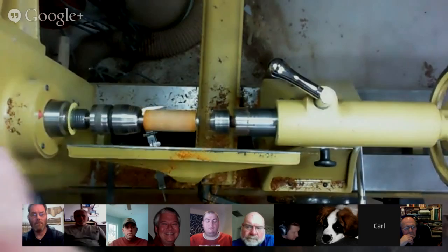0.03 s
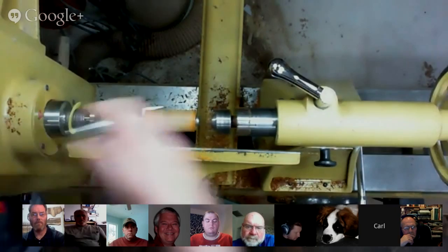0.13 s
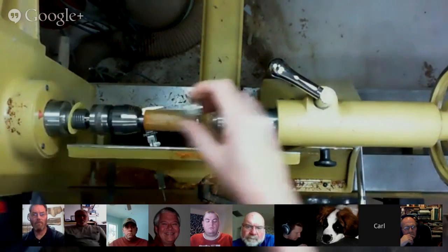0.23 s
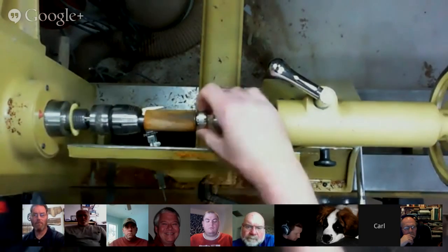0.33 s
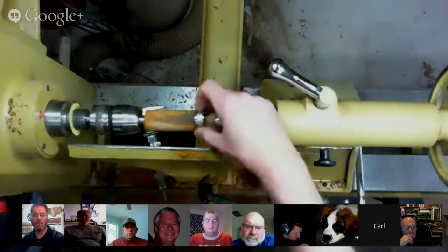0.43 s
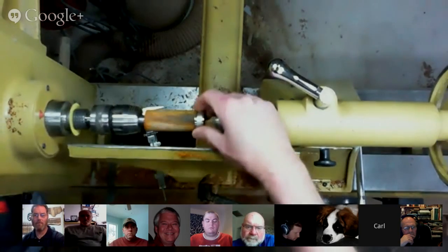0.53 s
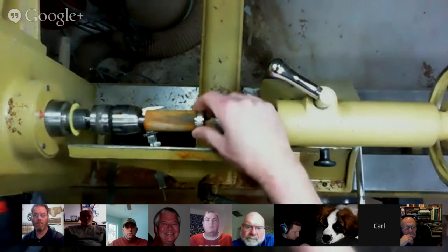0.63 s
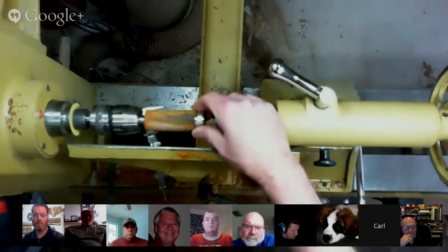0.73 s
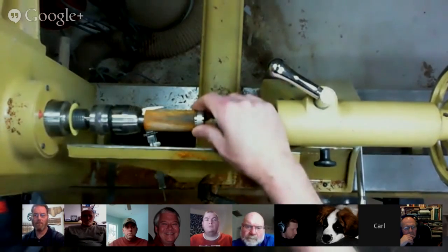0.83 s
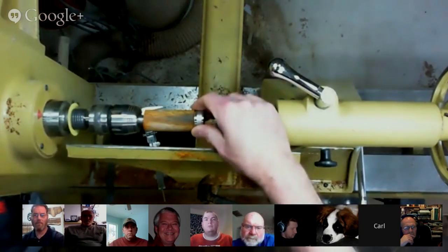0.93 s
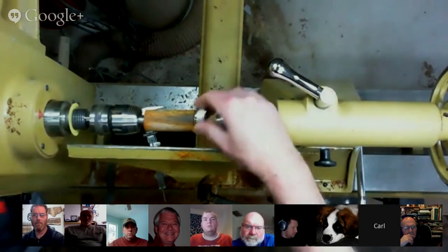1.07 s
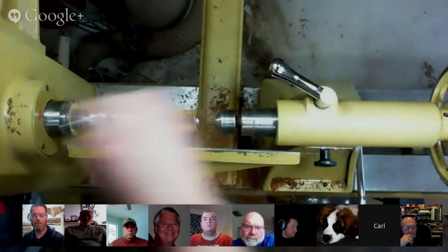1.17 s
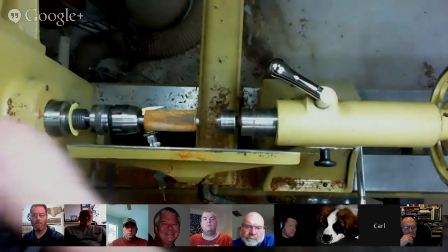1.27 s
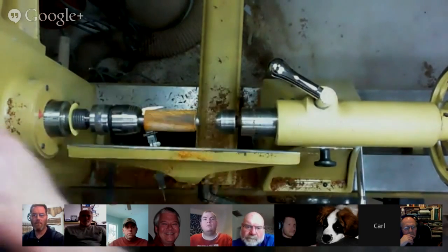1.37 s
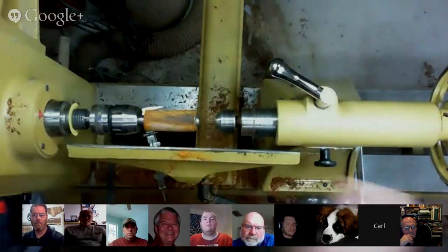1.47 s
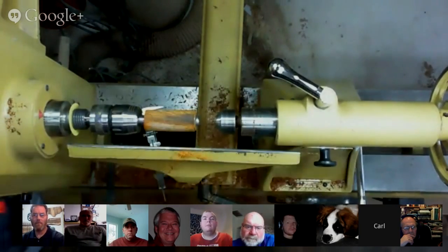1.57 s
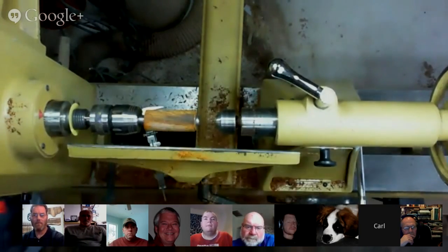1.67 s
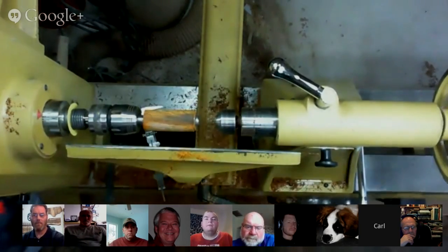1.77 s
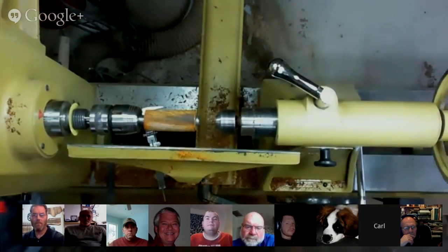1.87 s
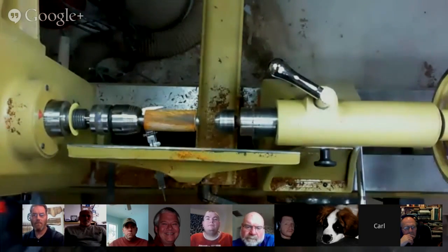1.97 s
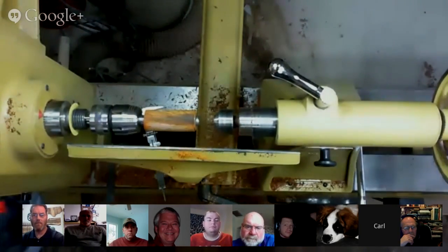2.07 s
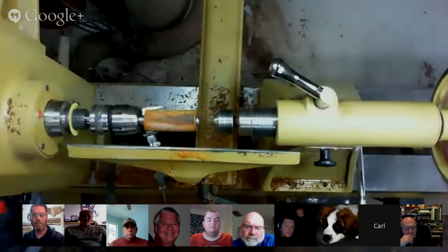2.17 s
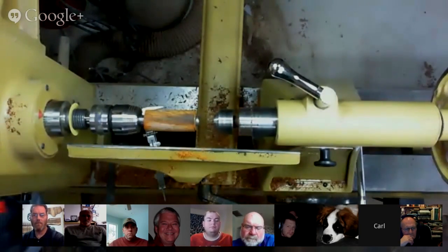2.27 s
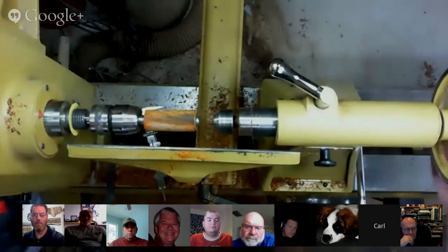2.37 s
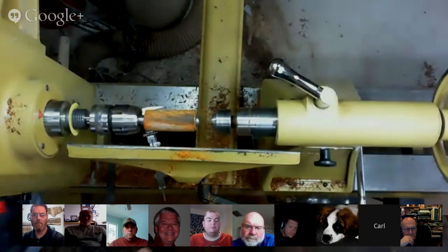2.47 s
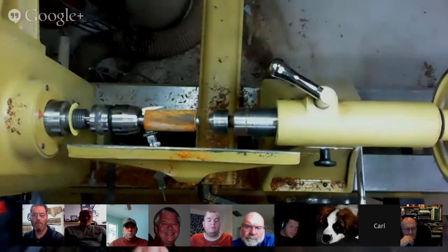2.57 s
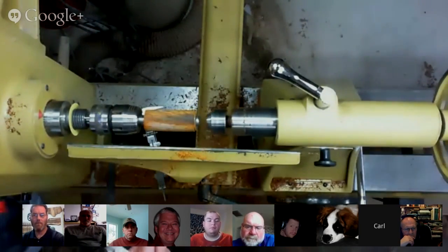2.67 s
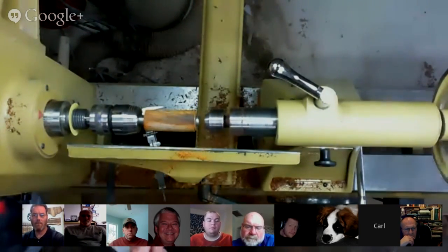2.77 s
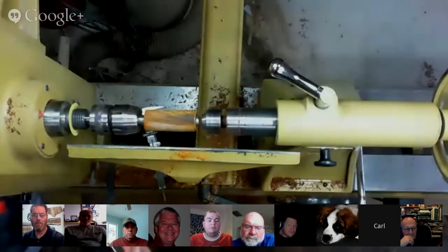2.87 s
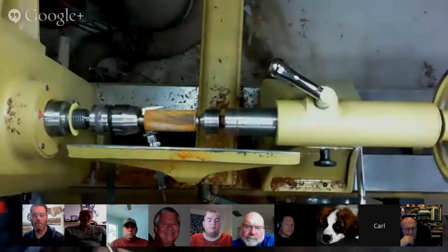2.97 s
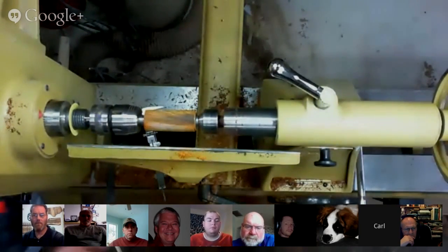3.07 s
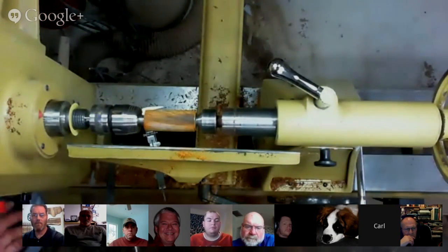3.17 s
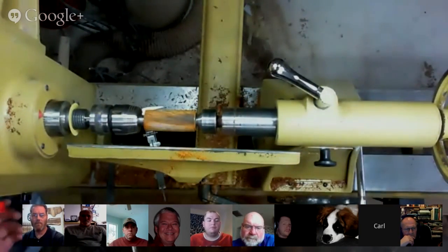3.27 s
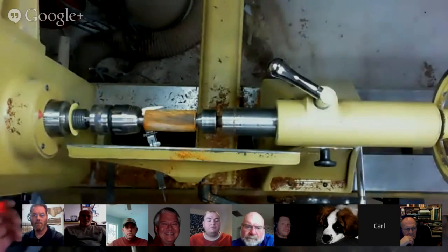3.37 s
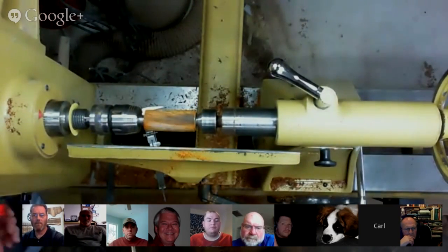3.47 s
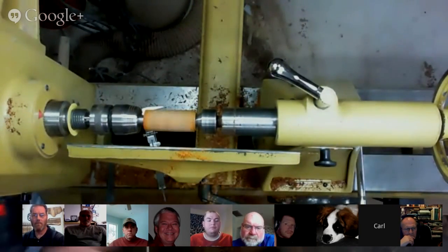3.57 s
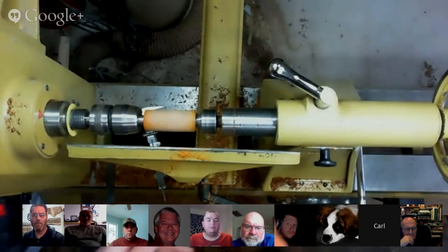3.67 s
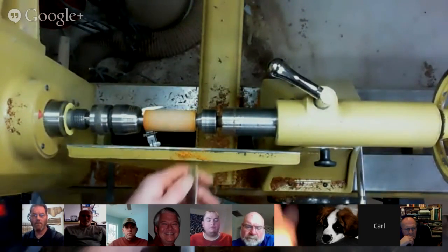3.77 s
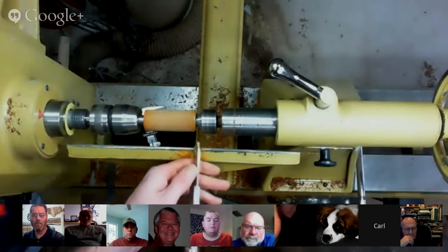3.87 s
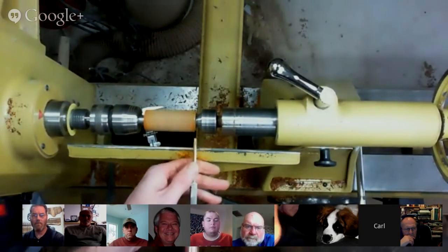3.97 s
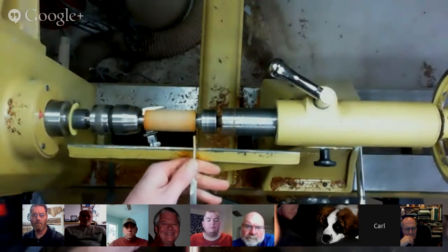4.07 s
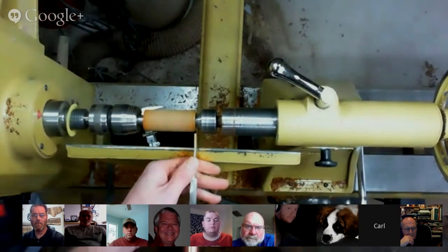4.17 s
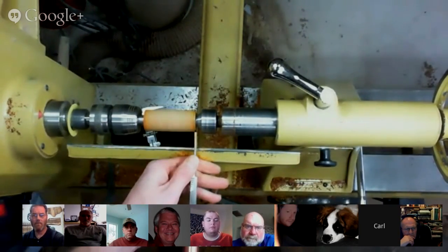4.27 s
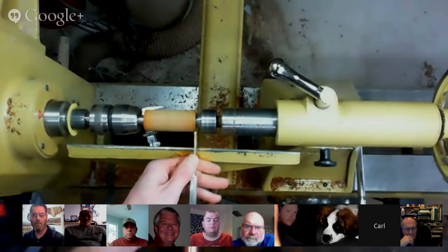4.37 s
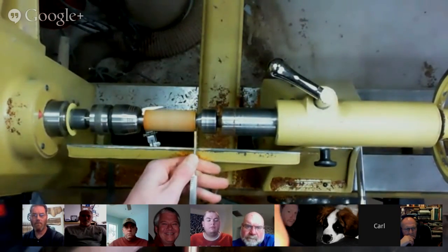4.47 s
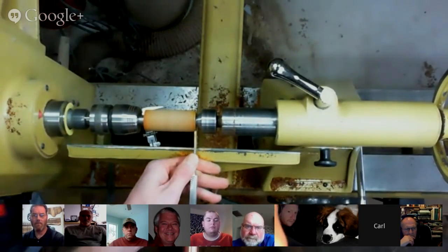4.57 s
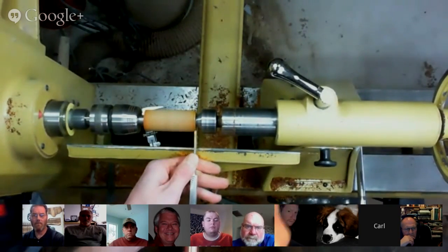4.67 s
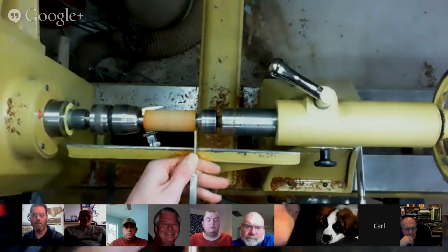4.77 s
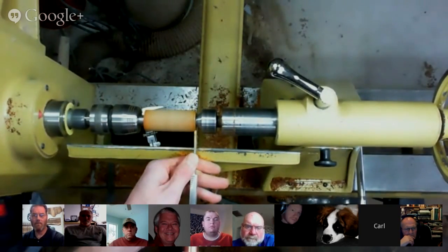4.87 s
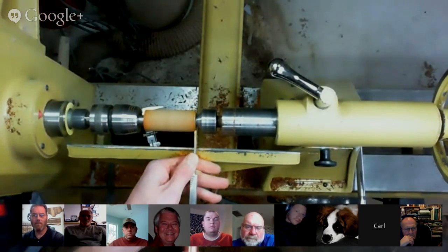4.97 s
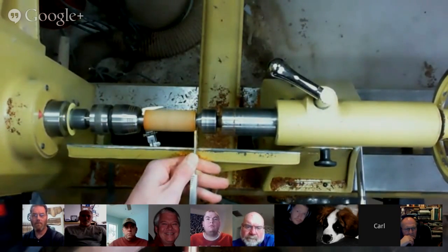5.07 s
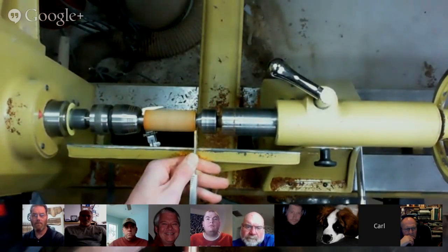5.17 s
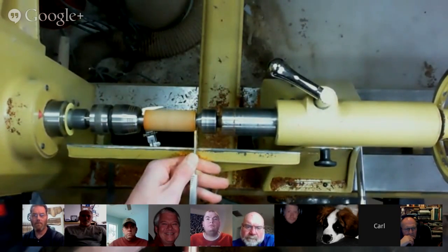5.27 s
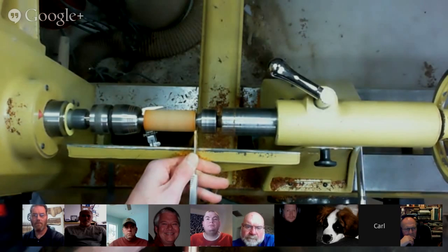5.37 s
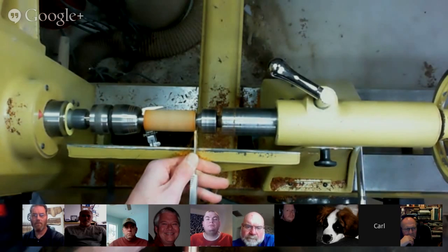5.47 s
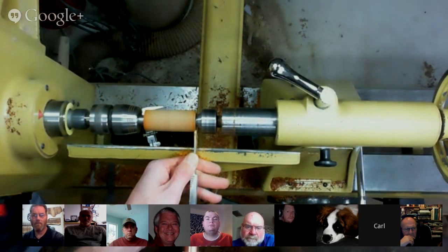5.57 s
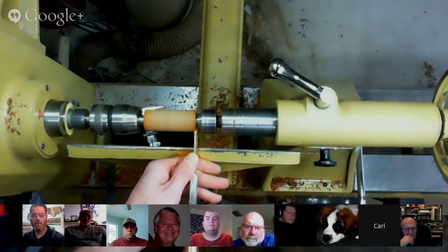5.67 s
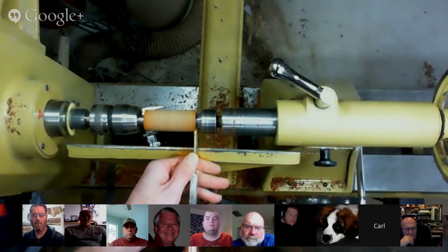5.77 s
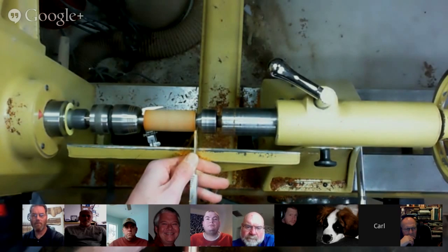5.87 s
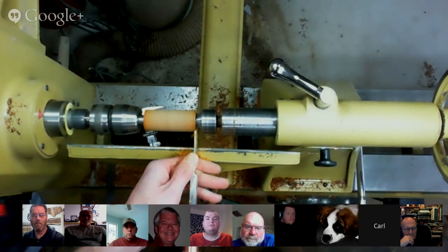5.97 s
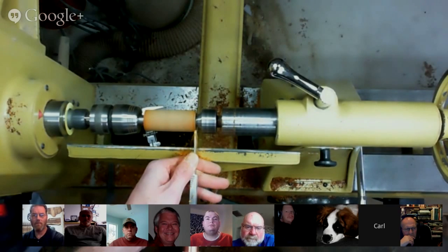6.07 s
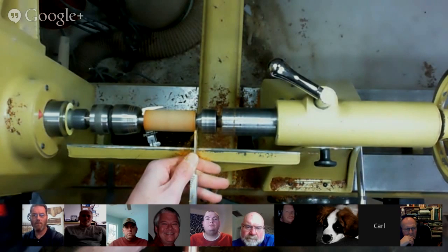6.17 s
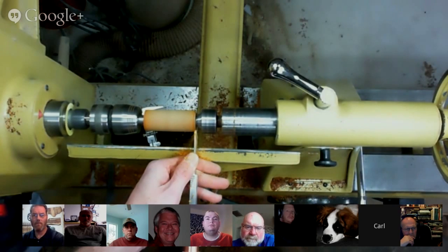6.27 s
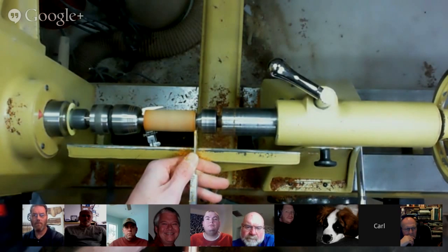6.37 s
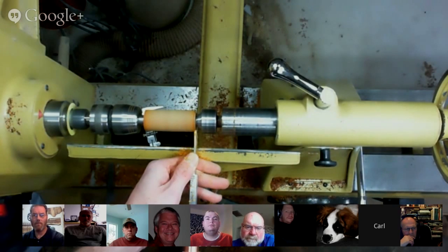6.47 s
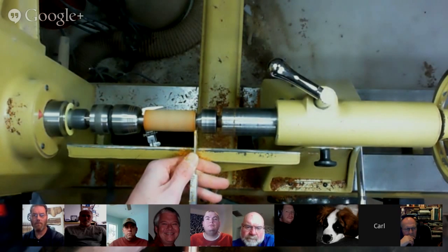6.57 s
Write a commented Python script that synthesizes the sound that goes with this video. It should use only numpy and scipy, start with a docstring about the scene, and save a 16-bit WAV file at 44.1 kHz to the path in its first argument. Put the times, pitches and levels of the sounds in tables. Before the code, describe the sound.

Hands knock and slide the steel fittings of a small wood lathe, giving irregular light taps and a few firmer clunks. The motor starts and whirrs with a brief rising whine. A parting tool bites into the spinning wood with a rasping hiss, a thin squeal and a short throb, then lifts away and is set down with a clink. The workshop is nearly silent between sounds, heard through a dull, patchy mono call microphone.

```python
"""Parting cut on a small wood lathe

Hands knock and slide the steel fittings, the motor runs up, then a parting tool bites. The same wood
passes the edge once a turn, so the hiss repeats and rings the tool; the tool is lifted and set down.
The workshop is heard through a mono call microphone that is nearly silent between sounds."""
import sys
import numpy as np
from scipy import signal
from scipy.fft import rfft, irfft
from scipy.io import wavfile
from scipy.ndimage import uniform_filter1d

SR = 44100
rng = np.random.default_rng(int(sys.argv[2]) if len(sys.argv) > 2 else 0)


def master_out(mix):
    """Clip the mix to full scale and print it as 16-bit PCM to the path in sys.argv[1]."""
    frames = np.transpose(np.atleast_2d(mix))
    ceiling = np.clip(frames, -1, 1)
    pcm = np.round(ceiling * 32767).astype(np.int16)
    wavfile.write(sys.argv[1], SR, pcm)


N = 291545
TIME = np.arange(N) / SR
TURN_SAMPLES = 1327  # one spindle turn, 33.2 turns a second


def undb(db):
    """Decibels to gain."""
    return 10 ** (np.asarray(db) / 20)


def unit(x):
    """Scale to rms 1."""
    return x / np.sqrt(np.mean(x ** 2))


def automation(table):
    """A soft gate, open over the table's time span, then each column as a curve."""
    times, *columns = np.transpose(table)
    gate = uniform_filter1d(((TIME >= times[0]) & (TIME <= times[-1])) * 1., size=400)
    return [gate] + [np.interp(TIME, times, column) for column in columns]


def eq_curve(hz, points):
    """Gain of (Hz, dB) points joined on a log-frequency axis."""
    freqs, db = np.transpose(points)
    return undb(np.interp(np.log(hz + 1), np.log(freqs), db))


def resonances(hz, modes):
    """Summed gain of (Hz, width in Hz, dB) resonances."""
    return np.sqrt(sum(undb(2 * db) / (1 + ((hz - f) / (width / 2)) ** 2) for f, width, db in modes))


def shaped(x, gain):
    """Filter by a function of frequency; rms 1."""
    return unit(irfft(rfft(x) * gain(np.fft.rfftfreq(len(x), 1 / SR)), len(x)))


def high_shelf(x, hz, db):
    """Move the treble above hz by a dB curve."""
    treble = signal.sosfiltfilt(signal.butter(2, hz, "high", fs=SR, output="sos"), x)
    return x + (undb(db) - 1) * treble


def wander(rate_hz):
    """Smooth random motion with a spread of 1."""
    hold = int(SR / rate_hz)
    held = np.repeat(rng.standard_normal(N // hold + 1), hold)
    smooth = uniform_filter1d(uniform_filter1d(held, hold), hold)[:N]
    return smooth / np.std(smooth)


def flicker(x, depth_db, rate_hz):
    """Let each half-octave band wander in level on its own; rms 1."""
    spectrum, octave = rfft(x), np.log2(np.fft.rfftfreq(N, 1 / SR) + 1)
    bands = (irfft(spectrum * np.clip(1 - 2 * abs(octave - c), 0, 1), N) for c in np.arange(4, 13.6, .5))
    return unit(sum(band * undb(depth_db * wander(rate_hz)) for band in bands))


def turning_noise(memory):
    """Noise that comes round again, keeping the share `memory` of the turn before."""
    turns = rng.standard_normal((N // TURN_SAMPLES + 1, TURN_SAMPLES))
    return unit(signal.lfilter([1], [1, -memory], turns, axis=0).ravel()[:N])


# Tool pressure in the wood. Each row: time in seconds, level in dB, squeal against the hiss in dB.
CUT_PRESSURE = [(3.72, -62, -20), (3.78, -47, -6), (3.89, -44.5, -10.5), (4.15, -40.5, -10),
                (4.28, -39.5, -3.5), (4.6, -38.5, -3.5), (5.01, -39, -12), (5.2, -37.5, -22),
                (5.5, -39, -13), (5.6, -41, -8.5), (5.97, -43.5, -9), (6.03, -58, -18)]
# Colour of the tearing fibres. Each row: frequency in Hz, level in dB.
FIBRE_EQ = [(710, -23), (1200, 0.5), (1500, -7.5), (1940, -12), (2690, -3.5), (3640, -2.5), (4060, -0.5),
            (5710, -4.5), (6280, 2.5), (7960, -20.5), (10300, -89), (17500, -120)]
# The tool's throb: start and end in seconds, rate in Hz, time of one crest in seconds, depth in dB.
CHATTER = (4.47, 4.97, 13.7, 4.775, 4.2)

def parting_cut():
    """Fresh fibres tear in a broad hiss while the tool rings, squeals and briefly throbs."""
    gate, level_db, squeal_db = automation(CUT_PRESSURE)
    fibres = rng.standard_normal(N) + .7 * turning_noise(memory=.97)
    hiss = shaped(fibres * undb(.69 * wander(400)), lambda hz: eq_curve(hz, FIBRE_EQ))
    ring = tool_ring()
    squeal = shaped(turning_noise(memory=.6), lambda hz: resonances(hz, [(4023, 410, 0)]) ** 2)
    squeal *= undb(squeal_db + 2.1 * wander(30))
    rasp = flicker(hiss + undb(-3) * ring, depth_db=1.94, rate_hz=22)
    rasp = high_shelf(rasp, hz=4300, db=.94 * jolts_db())  # the treble jolts nearly twice as far
    start, end, throb_hz, crest, depth_db = CHATTER
    arch = np.sin(np.pi * np.clip((TIME - start) / (end - start), 0, 1))
    throb_db = depth_db * arch * np.cos(2 * np.pi * throb_hz * (TIME - crest))
    return gate * undb(level_db + throb_db + jolts_db()) * (rasp + squeal)


# Modes of the tool and its rest. Each row: pitch in Hz, width in Hz, level in dB per Hz.
TOOL_MODES = [(1060, 290, -11), (1777, 26, -7), (1937, 75, -3), (2654, 210, -4), (3056, 38, -1.5),
              (3440, 190, -7), (4400, 58, -3), (4820, 490, -9.5), (6310, 330, -7.5)]

def tool_ring():
    """The groove's repeating shape rings the tool modes, each wavering as the grip shifts."""
    groove, ring = turning_noise(memory=.81), np.zeros(N)
    for pitch, width, db in TOOL_MODES:
        mode = shaped(groove, lambda hz: resonances(hz, [(pitch, width, 0)]) ** 1.77)
        ring += undb(db + 10 * np.log10(width) + 2.5 * wander(14)) * mode
    return unit(ring)


# Jolts in the cut and the motor. Each row: start in seconds, jump in dB, settling time in seconds.
JOLTS = [(4.323, -12, 0.079), (5.06, -14.5, 0.045), (5.139, 3, 0.033), (5.504, 4.5, 0.064)]

def jolts_db(rise_s=.015):
    """The level drops or leaps at once, then settles back."""
    return sum(db * np.clip((TIME - start) / rise_s, 0, 1)
               * np.exp(-np.maximum(TIME - start - rise_s, 0) / settle) for start, db, settle in JOLTS)


# Knocks and scuffs on the lathe. Each row: time in seconds, peak in dB, ring in Hz,
# body at 400 Hz in dB, treble at 5 kHz in dB, seconds to fade by 60 dB.
KNOCKS = [(0.396, -25.5, 1008, -15, -29, 0.18), (0.564, -69.5, 890, -4, -4, 0.46),
          (0.657, -45, 1180, -11, -19.5, 0.17), (0.723, -52.5, 1470, -15, -16.5, 0.083),
          (0.899, -53, 750, -7.5, -45.5, 0.18), (0.933, -40.5, 920, -0.5, -31.5, 0.047),
          (1.001, -21, 1090, -6.5, -32.5, 0.059), (1.063, -54.5, 1170, 7, -14.5, 0.4),
          (1.129, -47.5, 1070, -22, -41, 0.051), (1.167, -40.5, 1064, -3.5, -40, 0.2),
          (1.235, -41, 1030, 4, -63, 0.13), (1.488, -68, 1034, 6, -8.5, 0.33),
          (1.686, -44, 868, 1.5, -29, 0.75), (1.721, -32.5, 750, 4.5, -39, 0.51),
          (1.882, -37.5, 1070, 2.5, -45, 0.28), (1.942, -47, 930, -15.5, -4, 0.16),
          (2.007, -38, 1095, -3, -55, 0.21), (2.066, -56.5, 1040, -2, -30, 0.16),
          (2.151, -44, 1020, -3.5, -68, 0.24), (2.323, -56, 1070, 3, -64, 0.13),
          (2.415, -19.5, 910, -1, -17.5, 0.15), (2.468, -27.5, 1004, 6, -31.5, 0.14),
          (2.585, -59, 1190, -9, -5, 0.65), (2.631, -50.5, 985, 11, -4.5, 0.086),
          (2.74, -19.5, 757, -1, -4.5, 0.13), (2.79, -33, 1250, -1.5, -18, 0.15),
          (2.864, -38, 940, 4.5, -56, 0.099), (2.921, -42, 760, -4, -28.5, 0.41),
          (6.525, -27, 1973, -1.5, -10.5, 0.15)]
# Modes of the iron bed and fittings. Each row: pitch in Hz, width in Hz, level in dB.
BED_MODES = [(303, 34, -3), (880, 19, -15), (1119, 480, -3.5), (1420, 420, -2), (1900, 420, -6.5),
             (3580, 100, -10.5), (4270, 23, -24.5), (5060, 55, -18.5), (5100, 28, -18), (5400, 93, -18.5),
             (5450, 90, 3.5), (6630, 830, 10.5)]
# Low modes of the cast body. Each row: pitch in Hz, width in Hz, level in dB.
BODY_MODES = [(267, 180, -4.5), (338, 83, -5.5), (620, 29, 1.5)]

def knocks(lead_s=.05, rise_s=.022, tail_db=-23, tail_t60=.9):
    """Each contact is a short rattle that rings the bed modes, with a slower workshop tail."""
    out, t = np.zeros(N + SR), np.arange(SR // 2) / SR
    attack = np.sin(np.pi / 2 * np.clip((t - lead_s) / rise_s, 0, 1)) ** 2.14  # padded by fingers
    age = np.maximum(t - lead_s - rise_s, 0)
    gate = np.clip((.15 - age) / .13, 0, 1)  # chops the tail short
    for when, peak_db, ring_hz, body_db, treble_db, t60 in KNOCKS:
        tilt = [(70, body_db - .5), (160, body_db - 4.5), (400, body_db), (900, -.84),
                (2500, -6 + .39 * treble_db), (5000, treble_db), (7800, treble_db - 22.5)]
        # every contact point wakes other small parts
        parts = [(1800 + 5400 * u, 160, 3 - 10 * v) for u, v in rng.uniform(size=(14, 2))]
        ring_and_body = [(ring_hz, 90, 5)] + [(f, width, db + body_db) for f, width, db in BODY_MODES]

        def colour(hz):
            metal = .5 + 4.3 * resonances(hz, BED_MODES) + 2.83 * resonances(hz, parts) ** 1.5
            return eq_curve(hz, tilt) * metal + resonances(hz, ring_and_body) ** 2

        decay = undb(-60 * age / t60) + undb(tail_db - 60 * age / tail_t60)
        knock = shaped(rng.standard_normal(len(t)) * attack * decay * gate, colour)
        start = int((when - lead_s - rise_s / 2) * SR)
        out[start:start + len(t)] += undb(peak_db) * knock / np.max(abs(knock))
    return out[:N]


# The running lathe. Each row: time in seconds, level in dB, lift of the fan and belt hiss in dB.
MOTOR_RUN = [(3.045, -100, -5), (3.06, -65, -4), (3.1, -64.5, -10), (3.12, -51.5, -12), (3.17, -44.5, -4.5),
             (3.49, -47, 0), (4.21, -42.5, 6), (5.95, -45, 5.5), (6.2, -53, 3.5), (6.28, -50, 2),
             (6.34, -58, 2.5), (6.7, -55, 6.5)]
# Colour of the motor. Each row: frequency in Hz, level in dB.
MOTOR_EQ = [(100, -21), (230, -11.5), (330, -5.5), (440, -9), (620, -5), (900, -3), (1250, -7),
            (1600, -9.5), (2000, -10), (3200, -17.5), (4000, -25.5), (4900, -21), (6400, -23),
            (7400, -30.5), (8300, -61.5)]

def motor(jolt_share=.78, treble_jolt_share=.5):
    """Belt, bearings and fan make a whirr that partly repeats with each turn."""
    gate, level_db, air_db = automation(MOTOR_RUN)
    noise = .5 * turning_noise(memory=.33) + rng.standard_normal(N)
    whirr = flicker(shaped(noise, lambda hz: eq_curve(hz, MOTOR_EQ)), depth_db=1.23, rate_hz=24)
    whirr = high_shelf(whirr, hz=1800, db=air_db + (treble_jolt_share - jolt_share) * jolts_db())
    return gate * undb(level_db + jolt_share * jolts_db()) * whirr


def drive_whine(start_s=3.69, length_s=.43, from_hz=1010, rise_hz_per_s=880, level_db=-50):
    """The drive whines upward during run-up, doubled two octaves below."""
    age = np.clip(TIME - start_s, 0, length_s)
    phase = 2 * np.pi * np.cumsum(from_hz + rise_hz_per_s * age) / SR
    swell = np.sin(np.pi * age / length_s) * undb(level_db + 2 * wander(20))
    return swell * (np.sin(phase) + .8 * np.sin(phase / 4))


# Squeaks, rings and hums. Each row: start in seconds, pitch in Hz, level in dB, length in seconds.
SQUEAKS_AND_HUMS = [(0.165, 85, -67, 0.05), (0.242, 75.7, -71.5, .09), (0.64, 4090, -57, 0.051),
                    (0.688, 4110, -74, 0.11), (0.654, 110, -72, 0.12), (0.708, 1373, -60.5, 0.06),
                    (0.858, 794, -65.5, 0.053), (1.3, 108.3, -73.5, 0.21), (1.396, 832, -64.5, 0.049),
                    (1.521, 1270, -69, 0.045), (1.541, 1158, -72, 0.041), (2.415, 113.4, -43, 0.077),
                    (4.14, 761, -44, 0.052), (4.328, 1069, -50.5, 0.35), (4.87, 1777, -47, 0.2),
                    (5.67, 1836, -51, 0.11), (5.56, 4040, -50, 0.46)]

def squeaks_and_hums(fade_s=.016):
    """Short stretches of one pitch, rough in level and phase."""
    out, rough_db = np.zeros(N), 3.4 * wander(90)
    phase_drift = 1.2 * wander(90) + .5 * wander(300)
    for start, hz, db, length in SQUEAKS_AND_HUMS:
        t = np.arange(int(length * SR)) / SR
        span = slice(int(start * SR), int(start * SR) + len(t))
        swell = np.clip(np.minimum(t, length - t) / fade_s, 0, 1) * undb(db + rough_db[span])
        out[span] += swell * np.sin(2 * np.pi * hz * t + phase_drift[span])
    return out


# Colour of the bench rumble. Each row: frequency in Hz, level in dB.
BENCH_EQ = [(12, -37), (20, 4.5), (43, -1.5), (113, -11.5), (162, -13.5), (200, -7), (260, -40),
            (440, -120)]

def bench_rumble(thump_s=2.41, thump_db=-47, rise_s=.075, thump_t60=.13):
    """The bench is thumped once, then shaken by the motor and the cut."""
    _, motor_db, _ = automation(MOTOR_RUN)
    cutting, cut_db, _ = automation(CUT_PRESSURE)
    spin_up = np.clip((TIME - MOTOR_RUN[0][0]) / .2, 0, 1)
    motor_shake = spin_up * undb(-60.5 + .27 * (motor_db + 45))  # loosely follows the motor level
    shake = (motor_shake + cutting * undb(cut_db - 24.5)) * undb(2.2 * wander(6))
    age = np.maximum(TIME - thump_s - rise_s, 0)
    thump = np.clip((TIME - thump_s) / rise_s, 0, 1) * undb(thump_db - 60 * age / thump_t60)
    return (shake + thump) * shaped(rng.standard_normal(N), lambda hz: eq_curve(hz, BENCH_EQ))


# Colour of the room tone. Each row: frequency in Hz, level in dB.
ROOM_EQ = [(18, -19.5), (30, 1), (65, -9), (686, -15.5), (1120, -19.5), (2200, -27), (6760, -27),
           (7960, -43.5), (10300, -62), (17500, -120)]

def room_tone(level_db=-83.5):
    """The faint, flickering hush of the workshop."""
    hush = shaped(rng.standard_normal(N), lambda hz: eq_curve(hz, ROOM_EQ))
    return undb(level_db) * flicker(hush, depth_db=3, rate_hz=12)


def noise_suppressor(x, strength, exponent):
    """Turns down every short-time bin that does not stand above its neighbours in pitch."""
    bins = signal.stft(x, nperseg=1024)[2]
    power = uniform_filter1d(abs(bins) ** 2, size=3, axis=1) + 1e-18
    neighbours = uniform_filter1d(power, size=21, axis=0)
    gain = ((1 + strength) * power / (power + strength * neighbours)) ** exponent
    return signal.istft(bins * gain, nperseg=1024)[1][:N]


def scene():
    """Lathe and workshop at one microphone: both channels alike."""
    mix = knocks() + squeaks_and_hums() + motor() + bench_rumble() + drive_whine() + parting_cut()
    return np.tile(mix + room_tone(), (2, 1))


def record(dry):
    """A suppressor makes the sound patchy, the narrow line cuts the top, the output hisses faintly."""
    patchy = noise_suppressor(dry[0], strength=4.5, exponent=.48)
    dulled = signal.sosfilt(signal.butter(6, 7500, fs=SR, output="sos"), patchy)
    line = signal.sosfilt(signal.ellip(14, .5, 70, 8260, fs=SR, output="sos"), dulled)
    hiss = undb(-102) * rng.standard_normal(N)
    return np.tile(line + hiss, (2, 1))


dry = scene()
out = record(dry)
master_out(out)
```